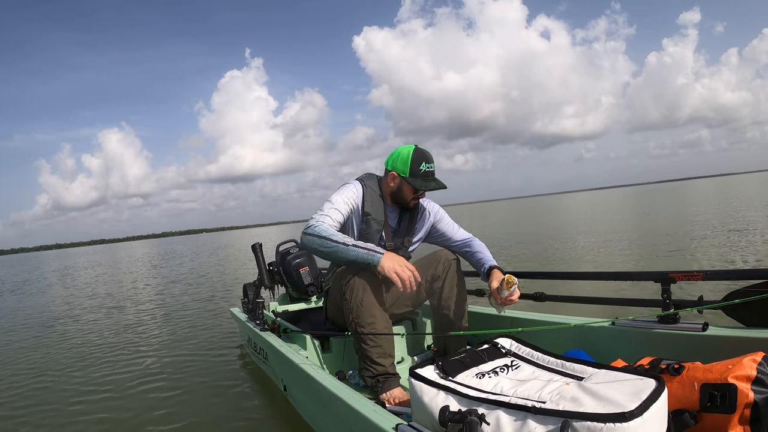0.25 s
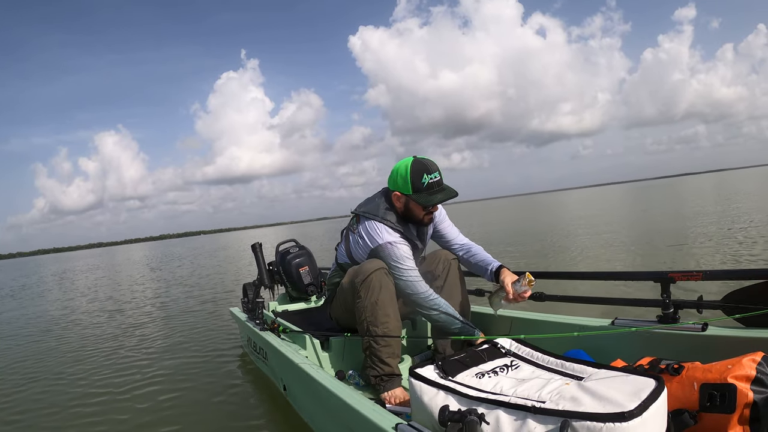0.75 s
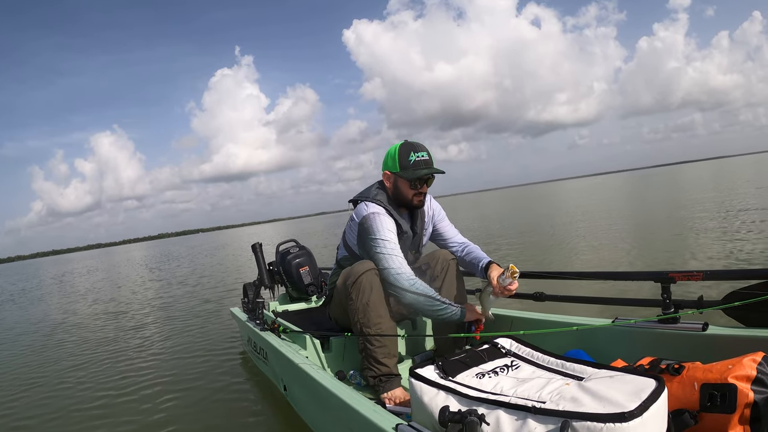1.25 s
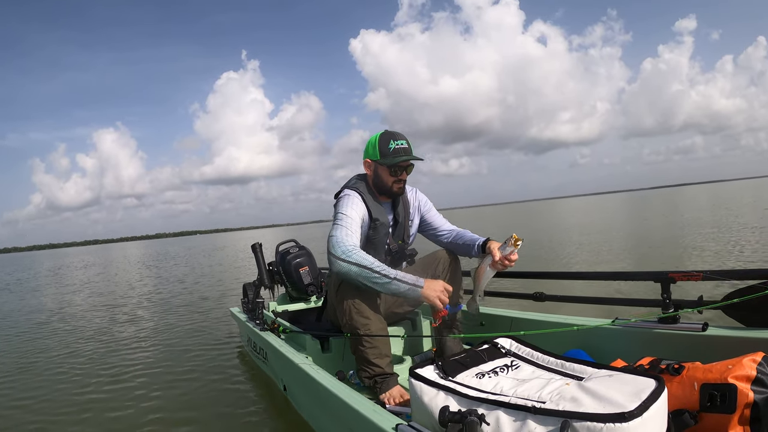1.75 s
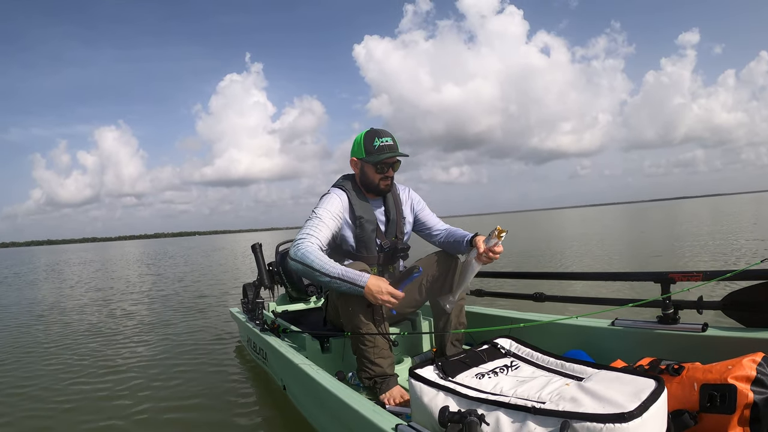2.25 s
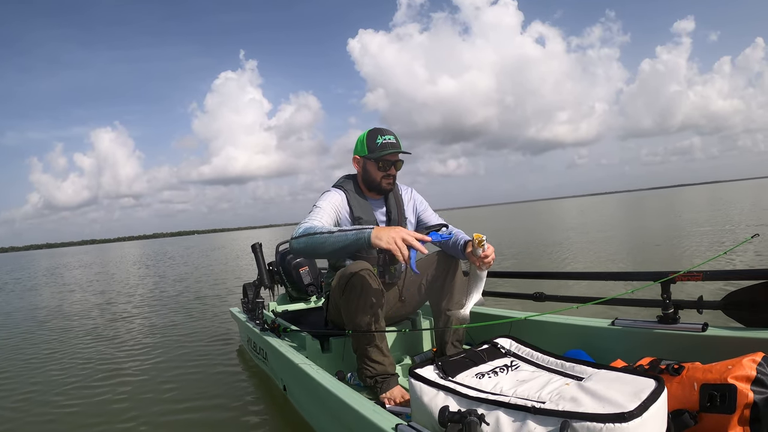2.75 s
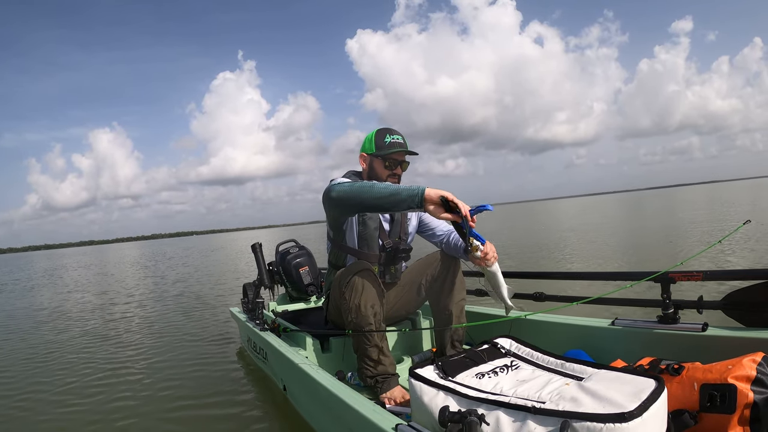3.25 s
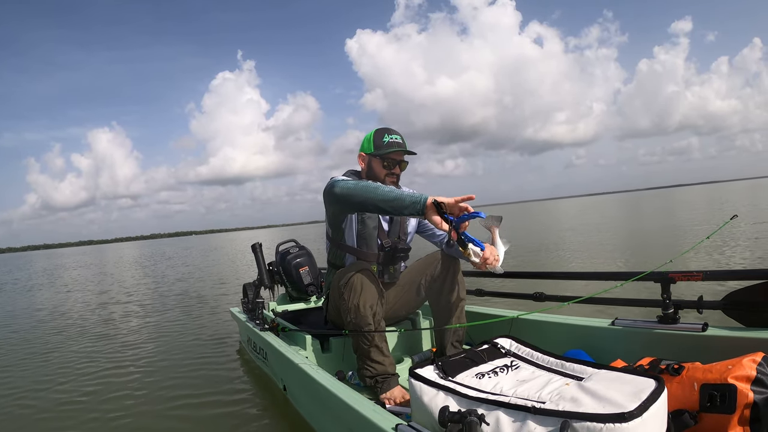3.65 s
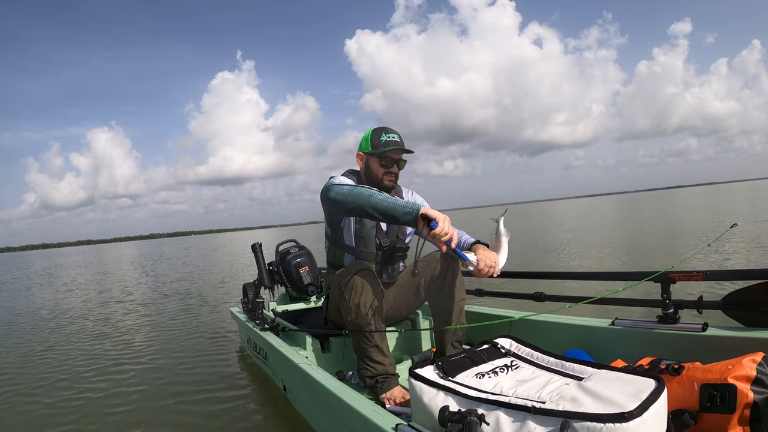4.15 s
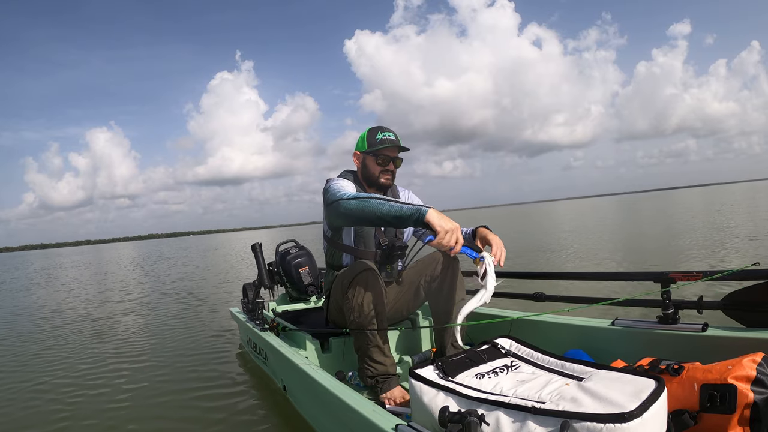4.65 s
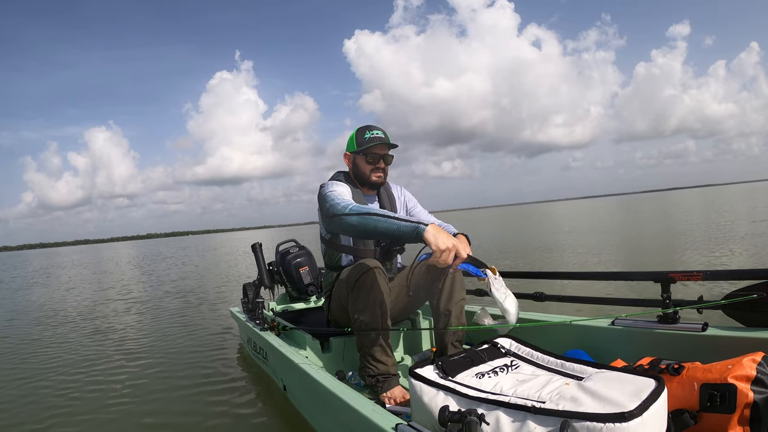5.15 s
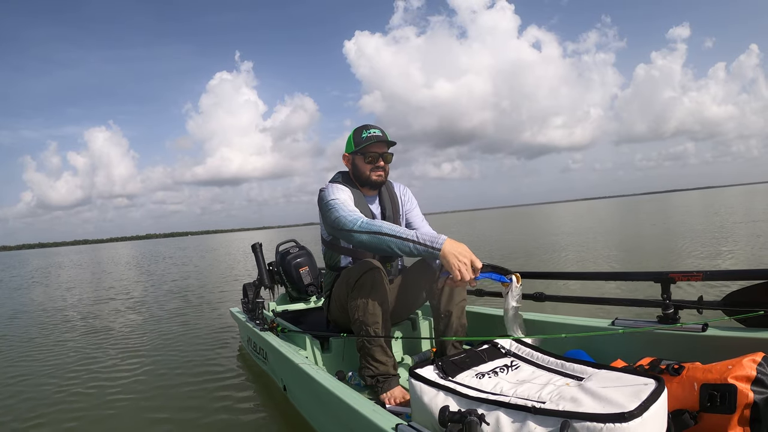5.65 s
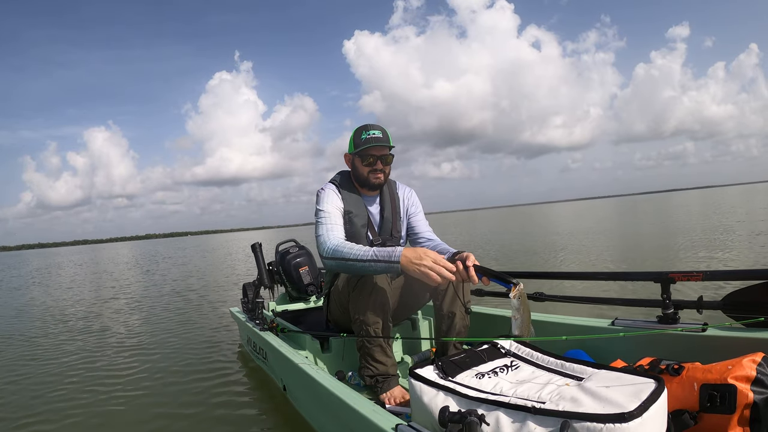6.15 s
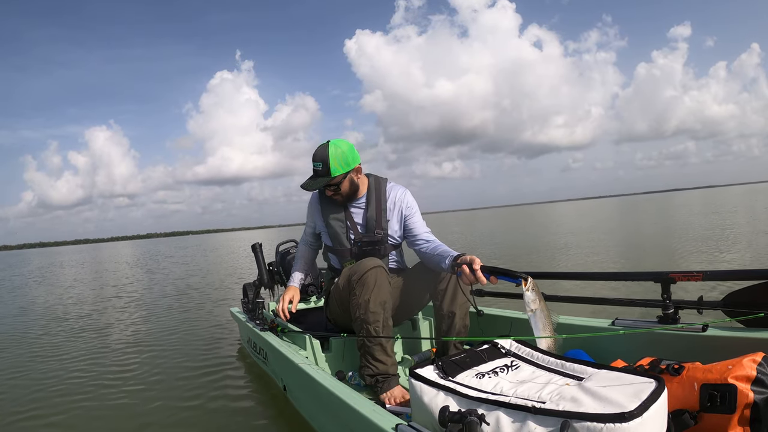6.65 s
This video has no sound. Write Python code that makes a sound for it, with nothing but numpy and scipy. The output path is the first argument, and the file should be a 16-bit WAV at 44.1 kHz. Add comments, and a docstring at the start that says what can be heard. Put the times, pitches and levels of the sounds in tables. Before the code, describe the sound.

Close, dry outdoor sound on a plastic kayak, with a very faint ripple murmur throughout. At 0 s a few light knocks and a low hull rumble; sleeves swish from about 0.2 s. From 0.75 to 0.85 s a cluster of strong hollow thumps, a small steel click at 0.95, another heavy knock at 1.13, a tiny squeak near 1.25, and rattling knocks until 1.5. Faint ticks at 1.85, then a sharp plastic clatter with hollow notes at 2.2-2.4. It is nearly quiet until about 3.7, with only slight rubs. At 3.85-3.9 a bright hollow clack and plier clicks; faint fish crackle in bouts until 4.75. From 4.8 to 5.6 steel clicks mix with soft booming, gurgling water slaps and dull knocks. Faint squeaks at 5.8, sleeve rustle from 6, light taps at 6.5-6.7. Stereo shrinks almost to mono after 1 s, reopening gradually from 3 s.

```python
"""Hollow thumps come first: feet and gear knock on the resonant hull of a plastic kayak on calm water.
A seated angler unhooks a small fish close by: filtered bursts make plastic clatter and steel clicks.
Random slips make rustling sleeves, hull rumble, scrapes, squeaks and the fish's crackle.
Sines make bubbles under the slapping hull and short hollow notes; shaped noise makes the ripples.
There are no walls to echo, only brief reflections; the stereo image closes almost to mono and reopens."""
import sys
import numpy as np
from scipy import signal
from scipy.fft import rfft, irfft, next_fast_len
from scipy.io import wavfile
from scipy.ndimage import uniform_filter1d, map_coordinates

SR = 44100
rng = np.random.default_rng(int(sys.argv[2]) if len(sys.argv) > 2 else 0)


def wrap_up_sound(samples):
    """Save the sound to the file named by the first command line argument, as 16-bit audio."""
    columns = np.atleast_2d(samples).T
    # keep every value between -1 and 1, then stretch to whole-number steps
    tamed = np.clip(columns, -1, 1)
    steps = np.round(tamed * 32767).astype(np.int16)
    wavfile.write(sys.argv[1], SR, steps)


N = 304373  # samples
HIT_S, LEAD_S = .25, .012  # length of one hit; time before its blow lands

# Blows on the hull: start_s, thud_level_db, thud_centre_hz, edge_db (re thud), edge_top_hz
HULL_BLOWS = [(0.038, -19.5, 123, -4, 2450), (0.069, -20.5, 480, -1, 1320), (0.099, -21.5, 170, 0, 2840),
              (0.762, -11.5, 326, -6.5, 1470), (0.783, -9.5, 122, -5.5, 1490),
              (0.802, -5.5, 207, -11.5, 1290), (0.8419, -8.5, 320, -5.5, 5040), (1.075, -17, 470, -1, 1390),
              (1.134, -4, 350, -12, 3980), (1.18, -13.5, 152, -12.5, 2000), (1.297, -18, 313, -1, 3300),
              (1.332, -14.5, 354, -1, 4000), (1.362, -13.5, 354, -3.5, 1900), (1.476, -18.5, 325, 1, 2300),
              (1.505, -29.5, 296, 10, 2760), (2.193, -21.5, 268, 2, 4500), (2.22, -23.5, 400, 10, 2480),
              (2.366, -21.5, 62, -7, 3000), (2.752, -31, 290, -5.5, 1930), (3.7, -36.5, 181, -2, 990),
              (5.006, -24, 325, -3, 1600), (5.026, -28, 230, 5, 1740), (5.064, -22, 557, 2.5, 910),
              (5.315, -24, 330, -19, 1000), (5.441, -18.5, 231, -12, 1630), (5.592, -26, 332, -10.5, 1000),
              (6.162, -25.5, 328, -4.5, 2500), (6.721, -30, 210, -20, 4040)]
# Plastic tackle clattering: start_s, level_db, decay_s, brightness_db (re body)
TACKLE_CLACKS = [(1.133, -17.5, 0.0038, -19), (1.854, -27, 0.0061, -3.5), (1.871, -27, 0.012, -10),
                 (1.966, -37, 0.0047, -0.5), (2.1927, -13.5, .008, -9), (2.219, -13, 0.0039, -19),
                 (2.235, -19.5, .009, -9), (2.245, -24, 0.0035, -11), (2.282, -22, 0.0026, -2.5),
                 (2.314, -38.5, 0.007, 9), (2.348, -26, .005, -10), (2.364, -21, 0.0095, -8),
                 (2.521, -29, 0.0033, -17), (3.109, -42, 0.0027, -12), (6.163, -41, 0.0014, 6),
                 (6.537, -31, 0.0035, -38), (6.663, -25, 0.0034, -30), (6.724, -23, 0.0038, -20)]
# Steel pliers on the hook: start_s, level_db, brightness_db (re body), lowest_hz
PLIER_CLICKS = [(0.9448, -18.5, -20.5, 1300), (1.3706, -33.5, 6, 3500), (3.852, -16.5, -11, 405),
                (3.917, -20, -14, 1850), (4.122, -40, -3, 1190), (4.146, -42, 0.5, 1190),
                (4.4287, -37, -7, 2000), (4.453, -30.5, -12, 3200), (4.4668, -42, 5, 2800),
                (4.4935, -26, -12, 3220), (4.503, -30.5, -2, 2800), (4.727, -37, -14, 3200),
                (4.793, -15, -9, 3000), (4.81, -21, -3.5, 1520), (4.8231, -22.5, -10, 1230),
                (4.9644, -27.5, -12.5, 2880), (5.004, -21, -9.5, 3100), (5.1079, -19, -4, 2150),
                (5.283, -30.5, 2.5, 2200), (5.435, -24.5, -9.5, 1750)]
# Hollow parts that sound a note when knocked: start_s, level_db, pitch_hz, decay_s
HOLLOW_NOTES = [(2.234, -21.5, 362, 0.019), (2.364, -18, 1025, 0.013), (2.522, -31.5, 1003, 0.011),
                (3.8525, -10.5, 986, 0.0048), (5.064, -18, 418, 0.023), (6.662, -22.5, 880, 0.0038)]
# Water slapping under the hull: start_s, boom_level_db, gurgle_db (re boom)
WATER_SLAPS = [(3.669, -40.5, 1.5), (4.809, -17, 0), (5.03, -16.5, -4), (5.11, -21.5, 3.5),
               (5.441, -18, -16), (5.582, -22.5, -10)]
# Short rubs of tool and grip: start_s, level_db, decay_s
TOOL_RUBS = [(1.775, -34.5, 0.0058), (2.615, -39.5, 0.14), (3.316, -40.5, 0.012), (3.561, -39.5, 0.018),
             (3.6346, -37.5, 0.011), (3.845, -30.5, 0.007), (3.885, -24.5, 0.0062), (3.895, -25.5, 0.0046),
             (5.494, -34, 0.0074)]
# Wet gear squeaking: start_s, length_s, level_db, lowest_hz
GEAR_SQUEAKS = [(1.236, 0.049, -37.5, 1800), (5.793, 0.037, -44, 1000), (5.851, 0.052, -44.5, 1000)]
# Bouts of the fish wriggling: start_s, length_s, level_db
FISH_WRIGGLES = [(3.315, 0.29, -64.5), (3.93, 0.25, -56), (4.184, 0.18, -55), (4.365, 0.21, -45),
                 (4.605, 0.16, -47.5), (5.409, 0.16, -45)]
# The angler's shifts of weight: peak_s, rumble_level_db, deep_flex_level_db
WEIGHT_SHIFTS = [(0.04, -28.5, -24), (0.81, -20, -22.5), (0.992, -22, -28.5), (1.359, -23.5, -51),
                 (1.62, -68, -42.5), (1.89, -48, -46), (2.222, -31.5, -41.5), (2.398, -62, -40.5),
                 (3.722, -42, -39), (3.95, -53.5, -37.5), (4.52, -45.5, -41), (4.739, -40.5, -36.5),
                 (5.058, -32.5, -23.5), (5.33, -38.5, -28), (5.62, -47.5, -30.5), (6.22, -43, -57)]
# Arm strokes: start_s, length_s, cloth_swish_level_db, weave_hiss_level_db
ARM_STROKES = [(-0.15, 0.58, -45, -49.5), (0.212, 1, -35.5, -46), (0.639, 0.47, -32, -41.5),
               (1.156, 0.35, -36.5, -47.5), (1.383, 0.57, -53.5, -57.5), (1.748, 0.71, -50.5, -52),
               (2.183, 0.26, -37.5, -49), (2.372, 0.43, -54, -53.5), (2.703, 0.66, -62, -69),
               (3.51, 0.55, -58.5, -57.5), (4.113, 0.39, -53, -60), (4.562, 0.95, -54.5, -51),
               (5.354, 0.27, -52, -47), (5.657, 0.54, -62, -47), (5.98, 0.66, -42, -51),
               (6.483, 0.5, -40.5, -46)]

# Resonances of the hollow hull: centre_hz, width_hz, level_db
HULL_MODES = [(59.8, 11.8, 4), (88.4, 7.4, 6), (172.6, 99, 5.5), (220, 12.7, 6), (254, 200, -9.5),
              (398.6, 57, 9), (472.4, 26, 4), (603, 220, -3), (1001, 23, -8.5)]
# Resonances of the deck: centre_hz, width_hz, level_db
DECK_MODES = [(580, 325, 5), (758, 47, 11.5), (948, 37, 9), (1157, 41, 9), (1490, 195, 5.5), (2315, 120, 3),
              (2600, 320, 1), (4130, 620, -11.5)]
# Resonances of the plastic tackle: centre_hz, width_hz, level_db
TACKLE_MODES = [(348, 184, 7), (664, 200, -19), (1004, 97, 4.5), (1342, 107, 10.5), (1760, 200, 6),
                (2230, 370, -1), (2760, 320, 0), (3430, 510, 1), (4030, 280, 0.5), (5280, 1500, -9.5),
                (7100, 4100, -17)]
# Resonances of the steel pliers: centre_hz, width_hz, level_db
PLIER_MODES = [(1130, 70, 9), (1810, 110, -3), (2520, 170, -2), (3250, 200, 1), (3680, 220, -2),
               (5080, 160, -3), (5570, 170, -4), (6660, 260, -12), (9000, 500, -14)]
# Resonances of the squeaking gear: centre_hz, width_hz, level_db
SQUEAL_MODES = [(1425, 31, 20), (2270, 45, 13), (3380, 50, 8), (4900, 1300, -15.5)]

# Spectrum of cloth swishing: frequency_hz, level_db
SWISH_SPECTRUM = [(200, 1.5), (400, 3.5), (700, 1.5), (1100, 5.5), (1600, 0.5), (2500, -2), (3500, -11),
                  (6000, -47.5)]
# Spectrum of fine weave hiss, also used for the fish: frequency_hz, level_db
WEAVE_SPECTRUM = [(1500, 0), (2600, -3.5), (3600, 1), (5200, -4), (9200, -15.5), (11000, -23.5),
                  (15500, -31)]
# Spectrum of the water murmur: frequency_hz, level_db
RIPPLE_SPECTRUM = [(100, -9.5), (180, 13.5), (450, 1), (750, -13), (1200, -14.5), (9000, -26), (15000, -58)]
# Phase between the two microphone ports: frequency_hz, left_lead_rad
PORT_LEAD = [(90, 0), (300, -.4), (600, -.8), (3600, -.9)]
# Level between the two microphone ports: frequency_hz, left_minus_right_db
PORT_LEVEL = [(60, 0.5), (200, 1.5), (600, 0.2), (3000, 3.5), (9000, -0.7)]

NOTE_SAG = 0.234  # a hollow note starts this share above its pitch
SQUEAK_WAVER = .006  # typical relative waver in playback speed
LOAD_S, RUMBLE_DECAY_S, FLEX_DECAY_S = 0.064, 0.11, 0.13  # build-up and settling of a weight shift
SPEED_POWER = 0.94  # rubbing grows with the speed of a movement to this power
REST_HISS_DB = -83  # weave hiss between strokes, before its flutter
NARROWS_S, NARROW_DECAY_S, OPENS_S, OPEN_RISE_S = 1.0, 0.14, 2.98, 3.06  # stereo image timing
WIDE_DB, NARROW_DB = 1, -44  # side gain: widest part and constant floor
TOP_HZ = 15700  # top of the final low-pass


def knocks():
    """Each blow booms in the hull and the panel it lands on; its edge raps the deck, whose low notes ring on."""
    out = np.zeros(N)
    for s, db, hz, edge_db, top_hz in HULL_BLOWS:
        force = contact(.004, snap=24, tail_db=-15, tail_s=.02, rise_s=.001)
        spot = 1 + .05 * rng.standard_normal()  # each spot retunes the resonances
        panel = ring(force, [(hz, hz / 3.5, 0)])
        boom = ring(force, HULL_MODES, spot) + 2 * panel
        thud = cut(cut(boom, hz * 1.6, "low"), hz * .65, "high")

        edge = contact(.004, snap=9, tail_db=-22, tail_s=.018, rise_s=.001)
        shudder = contact(.016, snap=0, tail_db=-22, tail_s=.018, rise_s=.001)
        shudder = cut(shudder, 900, "low", order=4)
        rap = ring(edge + undb(-7) * shudder, touched(DECK_MODES), spot)
        rap = cut(rap, top_hz, "low", order=4)
        add(out, s, undb(db) * (crest(thud) + undb(edge_db) * crest(rap)))
    return out


def tackle():
    """Plastic parts clack together and chatter in uneven bounces, each time at another spot."""
    out = np.zeros(N)
    for s, db, decay_s, bright_db in TACKLE_CLACKS:
        force = contact(decay_s, snap=0, tail_db=-16, tail_s=0.014, rise_s=0.003)
        force = force * undb(4 * walk(700)[:len(force)])  # uneven bounces
        spot = 1 + .03 * rng.standard_normal()
        shell = cut(ring(force, touched(TACKLE_MODES), spot), 9500, "low")
        crack = cut(shell, 4400, "high", order=3)
        body = cut(shell, 5200, "low", order=4)
        add(out, s, undb(db) * (crest(body) + undb(bright_db) * crest(crack)))
    return out


def pliers():
    """Steel jaws snap on the hook, thin at the tips, fuller when the grip is jolted; the hand damps them."""
    out = np.zeros(N)
    for s, db, bright_db, low_hz in PLIER_CLICKS:
        force = contact(.0018, snap=10, tail_db=-21, tail_s=.012, rise_s=.0012)
        grip = 1 + .015 * rng.standard_normal()  # the hold retunes the steel slightly
        steel = ring(force, touched(PLIER_MODES), grip) + undb(-12) * force
        tick = cut(cut(steel, 5700, "low"), 4530, "high", order=4)
        body = cut(cut(steel, 4200, "low", order=4), low_hz, "high", order=3)
        add(out, s, undb(db) * (crest(body) + undb(bright_db) * crest(tick)))
    return out


def hollows():
    """A knocked hollow part sounds one short note that sags as it dies."""
    out = np.zeros(N)
    t = np.maximum(np.arange(int(HIT_S * SR)) / SR - LEAD_S, 0)
    for s, db, hz, decay_s in HOLLOW_NOTES:
        fade = np.exp(-t / decay_s) * (t > 0)
        pitch = hz * (1 + NOTE_SAG * fade) * (t > 0)
        note = fade * np.sin(2 * np.pi * np.cumsum(pitch) / SR)
        add(out, s, undb(db) * note)
    return out


def slaps():
    """The rocking hull traps air against the water: short bubbles, the small ones first, and a boom."""
    out = np.zeros(N)
    t = np.arange(int(HIT_S * SR)) / SR
    late = np.linspace(0, 1, num=60)[:, None]  # order of the bubbles, first 0, last 1
    for s, db, gurgle_db in WATER_SLAPS:
        pitch, size = rng.random((2, len(late), 1))
        hz = 700 * 2 ** (2.3 * (pitch - .5) - .8 * late)  # random, tending lower with time
        age = np.maximum(t - LEAD_S - .035 * late ** 2, 0)
        fade = np.exp(-age * hz / 2.2)
        strength = size * (1 - 0.55 * late) / np.sqrt(hz)
        bubbles = np.sum(strength * np.sin(2 * np.pi * hz * age) * fade, axis=0)

        force = contact(0.017, snap=24, tail_db=-20, tail_s=0.09, rise_s=0.015)
        boom = cut(ring(force, HULL_MODES), 260, "low", order=3)
        add(out, s, undb(db) * (crest(boom) + undb(gurgle_db) * crest(bubbles)))
    return out


def rubs():
    """Tool and grip slide a little: a short run of slips through plastic and steel."""
    out = np.zeros(N)
    for s, db, decay_s in TOOL_RUBS:
        force = contact(decay_s, snap=0.36, tail_db=-58, tail_s=0.013, rise_s=0.012)
        slips = force * (rng.random(len(force)) < 5000 / SR)  # about 5000 slips a second
        plastic = ring(slips, touched(TACKLE_MODES))
        steel = ring(slips, touched(PLIER_MODES))
        add(out, s, undb(db) * crest(plastic + undb(-1.5) * steel))
    return out


def squeaks():
    """Wet gear sticks and slips in a few narrow resonances: a thin tone that wavers with the pressure."""
    out = np.zeros(N)
    for s, length_s, db, low_hz in GEAR_SQUEAKS:
        slide = np.cumsum(1 + SQUEAK_WAVER * walk(110))  # wavering read position, samples
        tone = ring(grains(5000, 2), SQUEAL_MODES)
        rasp = map_coordinates(tone, [slide], mode="mirror", order=2)
        thin = unit(cut(rasp, low_hz, "high", order=4))
        out += undb(db) * stroke(s, length_s) * thin
    return out


def fish():
    """The wet fish twists on the hook in bouts: a fine crackle in uneven spurts."""
    effort = together(undb(db) * stroke(s, length_s) for s, length_s, db in FISH_WRIGGLES)
    spurts = undb(3 * walk(45))
    return colour(crackle(260, 3.5), WEAVE_SPECTRUM) * spurts * effort


def rumble():
    """As weight shifts, feet and seat rub in slips that sound the hull, gear shuffles and the floor flexes."""
    rubbing = together(undb(db) * load(s, RUMBLE_DECAY_S) for s, db, _ in WEIGHT_SHIFTS)
    flexing = together(undb(db) * load(s, FLEX_DECAY_S) for s, _, db in WEIGHT_SHIFTS)
    slips = grains(700, 2.5) * undb(3 * walk(25))
    panels = unit(cut(cut(ring(slips, HULL_MODES), 114, "high", order=4), 740, "low"))
    gear = unit(cut(ring(grains(400, 3.5), DECK_MODES), 1800, "low"))
    floor = unit(cut(ring(grains(500, 6.3), HULL_MODES), 129, "low", order=4))
    sway = colour(grains(390, 3.3), [(10, 10.5), (22, -9), (45, -21), (200, -47.5)])  # (Hz, dB)
    return (panels + undb(-10.5) * gear) * rubbing + (floor + undb(-14.5) * sway) * flexing


def sleeves():
    """Arm strokes slide cloth on cloth: a dense swish, and a finer hiss in which single threads catch."""
    sliding = together(undb(db) * stroke(s, length_s) for s, length_s, db, _ in ARM_STROKES)
    catching = together(undb(db) * stroke(s, length_s) for s, length_s, _, db in ARM_STROKES)
    catching = catching + undb(REST_HISS_DB)  # the cloth is never quite still
    flutter = walk(67)
    swish = colour(grains(7000, 0.26), SWISH_SPECTRUM) * undb(2.45 * flutter)
    weave = colour(grains(15000, 2.5), WEAVE_SPECTRUM) * undb(2.0 * flutter)
    return swish * sliding + weave * catching


def water():
    """Ripples and light air murmur around the boat: shaped noise with a gently wandering level."""
    swell = undb(1.5 * walk(5))
    return colour(rng.standard_normal(N), RIPPLE_SPECTRUM) * undb(-57.0) * swell


def scatter(x, decay_s):
    """Deck and gear throw back a brief spray of reflections."""
    t = np.arange(int(HIT_S * SR)) / SR
    echoes = rng.standard_normal(len(t)) * np.exp(-t / decay_s)
    return signal.fftconvolve(x, echoes / np.linalg.norm(echoes))[:N]


def contact(length_s, snap, tail_db, tail_s, rise_s):
    """Force of a blow: noise swells briefly, then a snap and a two-stage decay; loose parts rattle on."""
    t = np.arange(int(HIT_S * SR)) / SR - LEAD_S
    before = .5 * np.exp(-abs(t) / rise_s)
    after = np.exp(-abs(t) / length_s) + undb(tail_db) * np.exp(-abs(t) / tail_s)
    force = rng.standard_normal(len(t)) * np.where(t < 0, before, after)
    force[int(LEAD_S * SR)] += snap
    return force


def stroke(start_s, length_s):
    """Strength of the rubbing in one movement: it speeds up from rest and slows to rest again."""
    out = np.zeros(N)
    moving = np.arange(max(int(start_s * SR), 0), min(int((start_s + length_s) * SR), N))
    progress = np.clip((moving / SR - start_s) / length_s, 0, 1)
    out[moving] = (4 * progress * (1 - progress)) ** SPEED_POWER
    return out


def load(s, decay_s):
    """Strain on the hull: it builds up to time s, then settles more slowly."""
    t = np.arange(N) / SR - s
    return np.exp(-abs(t) / np.where(t < 0, LOAD_S, decay_s))


def together(envelopes):
    """Overlapping movements add in power."""
    return np.sqrt(sum(e ** 2 for e in envelopes))


def grains(rate, spread_db):
    """Tiny random slips of uneven size, on average rate a second."""
    slipping = rng.random(N) < rate / SR
    return slipping * rng.standard_normal(N) * undb(spread_db * rng.standard_normal(N))


def crackle(rate, spread_db):
    """Tiny pops through twelve resonant pitches, on average rate a second at each."""
    pitches = np.geomspace(700, 12000, num=12)  # Hz
    return sum(ring(grains(rate, spread_db), [(hz, hz / 6, 0)]) for hz in pitches)


def walk(rate):
    """Random levels joined by straight lines, rate of them a second; spread near 1."""
    return 1.2 * np.interp(np.arange(N) / SR * rate, np.arange(2000), rng.standard_normal(2000))


def touched(modes):
    """The same resonances struck at another spot: each is a little stronger or weaker."""
    return [(hz, width, db + 3 * rng.standard_normal()) for hz, width, db in modes]


def ring(x, modes, stretch=1):
    """Drive resonances (Hz, width Hz, dB), stretched in pitch; neighbours swing in opposite directions."""
    out = 0
    for k, (hz, width, db) in enumerate(modes):
        b, a = signal.iirpeak(hz * stretch, hz / width, SR)
        out = out + (-1) ** k * undb(db) * signal.lfilter(b, a, x + 1e-18)
    return out


def cut(x, hz, kind, order=2):
    """Butterworth low-pass or high-pass."""
    return signal.sosfilt(signal.butter(order, min(hz, .45 * SR), kind, fs=SR, output="sos"), x)


def across(points):
    """Spread a table of (Hz, value) over the frequency bins of the whole sound, on a log scale."""
    hz, value = np.transpose(points)
    size = next_fast_len(N, real=True)
    bins_hz = np.arange(size // 2 + 1) * SR / size
    return np.interp(np.log(bins_hz + 1), np.log(hz), value)


def filtered(x, response):
    """Pass x through a response given on those frequency bins."""
    size = next_fast_len(N, real=True)
    return irfft(rfft(x, size) * response, size)[..., :N]


def colour(x, points):
    """Filter x by a curve of (Hz, dB) points, then scale to rms 1."""
    return unit(filtered(x, undb(across(points))))


def undb(db):
    """Decibels to gain."""
    return 10 ** (np.asarray(db) / 20)


def unit(x):
    """Scale to rms 1."""
    return x / np.sqrt(np.mean(x ** 2))


def crest(x):
    """Scale so that the loudest 3 ms have the power of a sine of height 1."""
    return x / np.sqrt(2 * uniform_filter1d(x ** 2, size=132).max())


def add(out, s, sound):
    """Mix a sound in, its ends faded, so that its blow lands at time s."""
    start = int((s - LEAD_S) * SR)
    sound = sound * signal.windows.tukey(len(sound), .06)
    sound = sound[max(-start, 0):N - start]
    out[max(start, 0):max(start, 0) + len(sound)] += sound


def width():
    """Gain of the side signal: it falls away quickly and creeps back."""
    t = np.arange(N) / SR
    closing = np.exp(-np.maximum(t - NARROWS_S, 0) / NARROW_DECAY_S)
    opening = 1 - np.exp(-np.maximum(t - OPENS_S, 0) / OPEN_RISE_S)
    return undb(WIDE_DB) * (closing + opening) + undb(NARROW_DB)


def scene():
    """Blows come from straight ahead; reflections, rumble and the broad rustle differ from side to side."""
    blows = knocks() + slaps() + tackle() + hollows() + pliers() + rubs() + fish() + squeaks()
    near = blows + rumble() + sleeves() + water()
    treble = cut(near, 7000, "high", order=1)
    reflections = scatter(undb(-15) * blows + undb(-4) * treble, decay_s=.008)
    # fresh rustle and rumble, independent of those in the middle
    side = reflections + undb(-14.5) * sleeves() + undb(-16) * rumble()
    return np.array([near + side, near - side])


def record(dry):
    """The two ports differ a little in phase and level; the image narrows for a while; the top is cut."""
    # each port takes half of the difference, in opposite directions
    tilt = undb(across(PORT_LEVEL) / 2) * np.exp(1j * across(PORT_LEAD) / 2)
    left, right = filtered(dry, np.array([tilt, 1 / tilt]))
    mid = (left + right) / 2
    side = (left - right) / 2 * width()
    low_pass = signal.ellip(10, .2, 80, TOP_HZ, fs=SR, output="sos")
    return signal.sosfilt(low_pass, np.array([mid + side, mid - side]))


dry = scene()
out = record(dry)
wrap_up_sound(out)
```